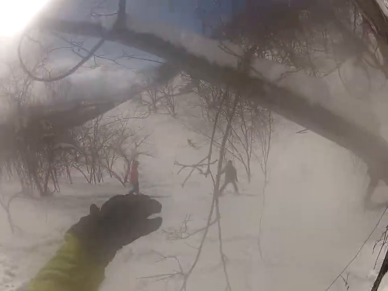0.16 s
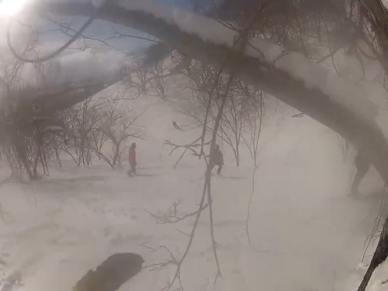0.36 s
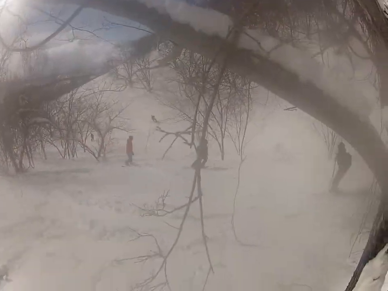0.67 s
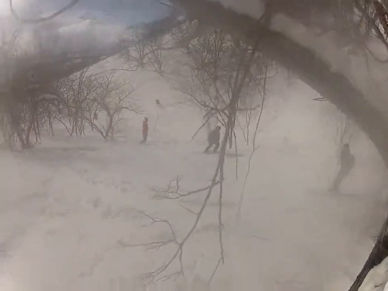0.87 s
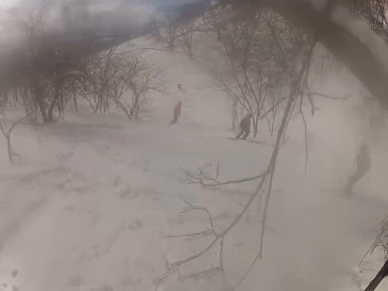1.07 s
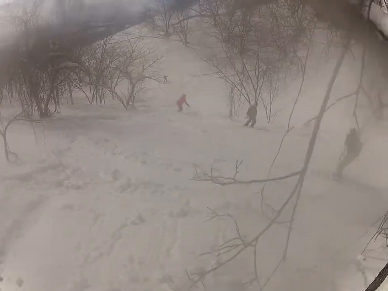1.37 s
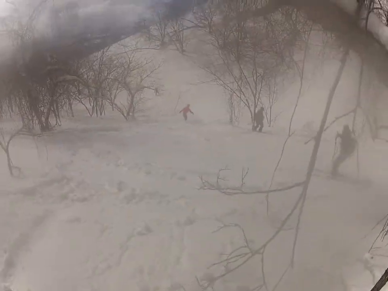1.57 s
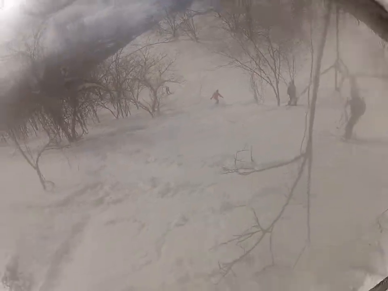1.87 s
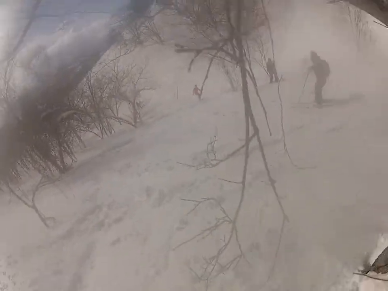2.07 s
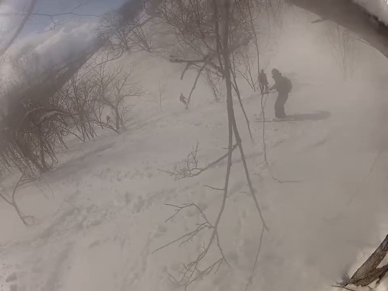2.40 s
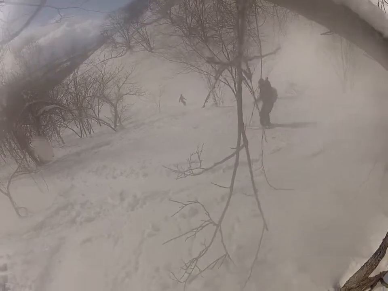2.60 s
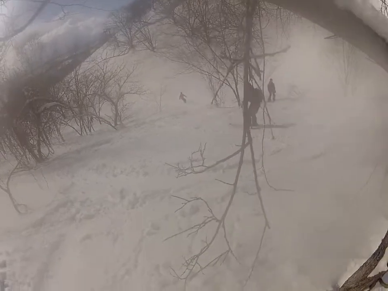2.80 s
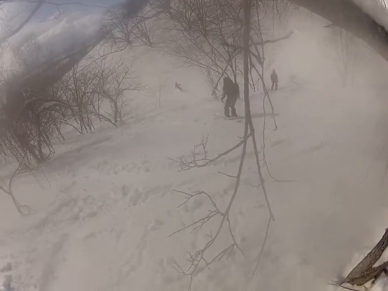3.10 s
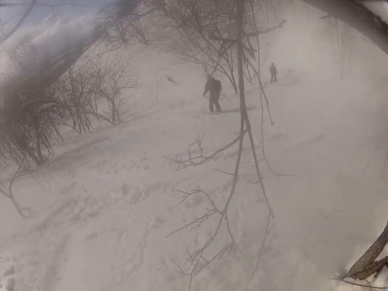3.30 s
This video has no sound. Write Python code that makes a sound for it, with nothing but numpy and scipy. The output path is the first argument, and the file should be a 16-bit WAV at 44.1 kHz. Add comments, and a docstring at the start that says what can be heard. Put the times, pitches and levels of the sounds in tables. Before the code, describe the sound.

Close, rough scraping of snow and twigs on a plastic camera case, with sharp knocks.

```python
"""A sleeve rustles softly; from about 2 s, snow and twigs scrape loudly over a camera's plastic case
as it is carried along a snowy slope. Each rub is stick-slip friction: a stream of tiny slips that
excites the resonances of the case and shakes it. Twigs tick and knock on it, soft bumps rock it,
and the hardest knock overloads the microphone. A faint wind lies underneath."""
import sys
import numpy as np
from scipy import signal
from scipy.fft import rfft, irfft
from scipy.io import wavfile

SR = 44100
rng = np.random.default_rng(int(sys.argv[2]) if len(sys.argv) > 2 else 0)


def wrap_up_sound(samples):
    """Save the sound to the file named by the first command line argument, as 16-bit audio."""
    columns = np.atleast_2d(samples).T
    # keep every value between -1 and 1, then stretch to whole-number steps
    tamed = np.clip(columns, -1, 1)
    steps = np.round(tamed * 32767).astype(np.int16)
    wavfile.write(sys.argv[1], SR, steps)


N = 152145

# resonances of the plastic case (f/Hz, half-width/Hz, level/dB)
CASE_MODES = [(473, 56, -10), (1089, 135.5, 1.15), (1420, 126, -2), (1836, 227, 1.5), (2254, 270, 2.5),
              (2740, 480, -6), (3320, 386, 0.3), (4830, 430, -9.5), (7120, 580, -13.5), (8630, 410, -9.5),
              (9760, 690, -8.5), (14500, 840, -12.5)]
# a slight broad lift near 770 Hz and two deep notches near 6 and 12 kHz (f/Hz, half-width/Hz, gain/dB)
COLOUR_BANDS = [(770, 420, 2), (6030, 254, -12), (11790, 440, -25)]
# thin ring after a contact (f/Hz, level re the hit at zero tilt/dB, T60/s)
RING_MODES = [(3510, -22, 0.028), (8530, -11, 0.0126)]
# spectra of wind, low shudder, hollow midrange and soft cloth (f/Hz, relative level/dB)
WIND_SPECTRUM = [(20, -0.5), (55, 1.5), (110, -9), (200, -8.5), (420, -16.5), (850, -23.5), (3600, -30.5),
                 (5000, -34), (6000, -44.5), (7000, -36.5), (14800, -45.5)]
SHUDDER_SPECTRUM = [(15, -19.5), (30, 0.5), (55, 1), (110, -5.5), (220, -4.5), (330, -15), (600, -43.5),
                    (1500, -76)]
HOLLOW_SPECTRUM = [(120, -30.5), (300, 1), (490, -7), (620, -10.5), (1050, -5.5), (1700, -17.5),
                   (5000, -41)]
CLOTH_SPECTRUM = [(700, 1), (1050, 10.5), (1500, 4), (1950, 11), (2600, -2.5), (4800, 2), (8500, -2.5),
                  (10000, 7)]
# soft bumps (crest t/s, peak level/dB, f/Hz, half-length/ms)
SOFT_BUMPS = [(0.818, -27.5, 50.4, 19.4), (1.384, -43.5, 43, 25), (2.169, -22.5, 56, 13),
              (2.3176, -11, 169, 3), (2.489, -22, 52.4, 17), (2.573, -18, 64, 10.3),
              (3.0347, -2, 157, 2.23), (3.1189, -14.5, 192, 1.97)]
# ticks and knocks on the case: a sleeve click at the start, then twigs (t/s, peak level/dB, tilt/dB per octave,
# decay time/ms, favoured f/Hz)
CONTACT_KNOCKS = [(.0095, -43.5, -1, 2.4, 2000), (0.0561, -38.5, -0.5, 3, 1970),
                  (0.0798, -31.5, -10, 1.77, 1300), (0.464, -28, -2, 1.05, 3470),
                  (1.061, -48.5, -0.5, 0.55, 3550), (1.1, -53.5, -11, 2.2, 1140),
                  (1.237, -40.5, -0.5, 2.4, 3650), (2.062, -39, .5, 0.59, 2250),
                  (2.095, -31.5, -0.5, 2.2, 3800), (2.2368, -8, -1, 4.3, 2070), (2.3021, -4, -1, 1.3, 1190),
                  (2.6026, -12, -1.5, .5, 3480), (2.6408, -5.5, -2, 1.3, 2680), (2.847, -26, -1, 0.95, 3430),
                  (3.0337, 5, -2.5, 1, 1406), (3.0351, 2.5, -2.5, 1.27, 3540), (3.0357, -1.5, -5.5, .7, 960),
                  (3.1298, -25.5, 0, .6, 3320), (3.2838, -14, -3.5, .5, 2170),
                  (3.314, -25.5, -1.5, 0.58, 2400), (3.375, -33, -0.5, 1.3, 3300)]
# brief scuffs (crest t/s, peak level/dB, tilt/dB per octave, half-length/ms, favoured f/Hz)
BRIEF_SCUFFS = [(0.192, -39, -0.5, 1.8, 4700), (0.215, -43.5, -1, 17, 1050), (0.4248, -38.5, 1, 3.3, 1090),
                (0.443, -44.5, -9, 6.1, 1030), (1.67, -50.5, 0, 6.6, 2300), (2.035, -49, -17, 28, 1080),
                (2.107, -35.5, 1.5, 11, 4000), (2.171, -8.5, -5, 2, 1160), (2.182, -2, -4, 2.9, 1800),
                (2.225, -32, -12, 12, 1090), (2.332, -8.5, -3, 5.1, 2300), (2.3641, -6.5, -2, 5.9, 1770),
                (2.429, -6, 1, 6.5, 2540), (2.4428, -7, 2, 1.45, 3200), (2.573, -18.5, -4.5, 2.6, 1780),
                (2.675, -26.5, 1.5, 2.6, 2300), (2.8845, -10, 1.5, 1.3, 2460),
                (3.345, -31.5, -2, 2.4, 2340)]
# rub envelopes of the sleeve and of snow and twigs (t/s, then level/dB of scrape, shudder, hollow)
SLEEVE_RUB = [(0, -54.5, -48.5, -93), (.10, -57.5, -46.5, -93), (.135, -62.5, -56.5, -71),
              (.18, -52.5, -51.5, -64), (.225, -60, -50, -88), (.26, -65.5, -55, -82),
              (.445, -63, -66.5, -86), (.49, -79, -77, -80)]
SNOW_RUB = [(1.99, -79, -79, -92), (2.025, -62.5, -57, -74), (2.142, -53, -62, -81),
            (2.150, -21, -22.5, -50), (2.177, -13.5, -25.5, -34), (2.192, -22, -35, -29),
            (2.206, -20, -34, -40), (2.23, -47, -42, -62), (2.255, -34, -50, -53), (2.295, -22, -31, -32),
            (2.315, -16, -22.5, -16), (2.346, -21.5, -29.5, -37), (2.362, -23.5, -25, -32),
            (2.384, -26, -30, -43), (2.41, -18, -30, -26.5), (2.43, -18.5, -28.5, -33.5),
            (2.462, -18, -28, -34), (2.488, -22, -27.5, -36), (2.51, -41.5, -45, -49),
            (2.565, -20.5, -29.5, -43), (2.596, -36.5, -41.5, -63), (2.63, -34.5, -29.5, -43),
            (2.70, -43, -49, -63), (2.77, -45, -52, -75), (2.83, -42, -35.5, -47), (2.895, -35.5, -30, -40),
            (2.97, -43.5, -45.5, -54), (3.025, -33, -28.5, -38), (3.052, -47, -38, -40.5),
            (3.10, -48.5, -40, -55), (3.123, -33, -29, -29), (3.144, -42, -30, -41),
            (3.167, -37.5, -27.5, -37), (3.178, -33, -17.5, -27), (3.191, -45, -30, -47),
            (3.202, -32, -28.5, -32), (3.235, -48.5, -44, -67), (3.277, -37.5, -36, -30),
            (3.30, -44, -37.5, -52), (3.328, -53, -46.5, -60), (3.40, -56, -50.5, -73),
            (3.45, -56, -55, -73)]

FILTER_HZ = np.maximum(np.arange(2049) * SR / 4096, 10)  # frequency grid of the filters


def undb(db):
    """Amplitude grows tenfold for every 20 dB."""
    return 10 ** (np.asarray(db) / 20)


def unit(x):
    """Normalisation brings a signal to rms 1."""
    return x / np.sqrt(np.mean(x ** 2))


def fluctuation(hz):
    """Low-passed noise varies at random, at rates up to about hz, with rms 1."""
    return unit(signal.sosfilt(signal.butter(2, hz, fs=SR, output="sos"), rng.standard_normal(N)))


def minimum_phase(x, gain_db):
    """Folding the cepstrum gives a causal filter with the given gains at FILTER_HZ."""
    cepstrum = irfft(np.log(undb(gain_db)))
    half = len(cepstrum) // 2
    cepstrum[1:half] *= 2
    cepstrum[half + 1:] = 0
    return signal.fftconvolve(x, irfft(np.exp(rfft(cepstrum))))[:len(x)]


def colour(x, spectrum):
    """Filtering weights a sound by a spectral envelope; the result has rms 1."""
    hz, db = np.array(spectrum).T
    return unit(minimum_phase(x, np.interp(np.log(FILTER_HZ), np.log(hz), db)))


def noise(spectrum):
    """White noise takes on the spectrum of its filter."""
    return colour(rng.standard_normal(N), spectrum)


def wind(level_db=-58, sway_db=1.4):
    """Moving air makes faint broadband noise, muffled by the case."""
    return noise(WIND_SPECTRUM) * undb(level_db + sway_db * fluctuation(hz=2.4))


def bumps():
    """A soft push rocks the case: a brief oscillation under a Gaussian envelope."""
    t = np.arange(N) / SR
    return sum(undb(db) * np.cos(2 * np.pi * hz * (t - s)) * np.exp(-((t - s) * 1000 / half_ms) ** 2)
               for s, db, hz, half_ms in SOFT_BUMPS)


def case(x, tilt_db, favoured_hz=None, favour_db=8, favour_octaves=0.27, valley_db=-22):
    """Resonance filters a contact force: harder contact adds treble, its place favours one region."""
    f = FILTER_HZ
    mode_power = sum(undb(db) ** 2 / (1 + ((f - hz) / width) ** 2) ** 2 for hz, width, db in CASE_MODES)
    modes = 10 * np.log10(mode_power + undb(valley_db) ** 2)
    bands = sum(db * np.exp(-((f - hz) / width) ** 2) for hz, width, db in COLOUR_BANDS)
    place = favour_db * np.exp(-(np.log2(f / favoured_hz) / favour_octaves) ** 2) if favoured_hz else 0
    tilt = tilt_db * np.log2(np.maximum(f, 1100) / 2000)
    return minimum_phase(x, modes + bands + place + tilt)


def knocks(click=0.83, size=4096):
    """Impact excites the case with a click and a crunch; harder contacts leave more thin ring."""
    out, t = np.zeros(N + size), np.arange(size) / SR
    for s, db, tilt_db, decay_ms, favoured_hz in CONTACT_KNOCKS:
        force = rng.standard_normal(size) * np.exp(-t * 1000 / decay_ms)
        force[0] += click
        hit = case(force, tilt_db, favoured_hz)
        ring = sum(undb(ring_db + 2 * tilt_db - 60 * t / t60) * np.sin(2 * np.pi * hz * t)
                   for hz, ring_db, t60 in RING_MODES)
        start = int(s * SR)
        out[start:start + size] += undb(db) * (hit / np.abs(hit).max() + ring)
    return out[:N]


def scuffs(size=4096):
    """Friction catches and lets go: a burst of slips swells and dies, ringing the case."""
    out, t_ms = np.zeros(N + size), (np.arange(size) - size // 2) * 1000 / SR
    for s, db, tilt_db, half_ms, favoured_hz in BRIEF_SCUFFS:
        force = rng.standard_normal(size) * np.exp(-(t_ms / half_ms) ** 2)
        burst = case(force, tilt_db, favoured_hz)
        start = int(s * SR) - size // 2
        out[start:start + size] += undb(db) * burst / np.abs(burst).max()
    return out[:N]


def cracks(per_s=160, level_db=-4):
    """Brittle fracture: single crystals of the snow crust break at random moments."""
    return undb(level_db) * unit(rng.uniform(-1.3, 1, N) * (rng.random(N) < per_s / SR))


def slips(per_s=4500, spread_db=-2.8, smooth_db=2):
    """Stick-slip motion gives random impulses of uneven size, with a smooth hiss between them."""
    sizes = rng.standard_normal(N) * undb(spread_db * np.minimum(rng.exponential(size=N), 4))
    impulses = unit(sizes * (rng.random(N) < per_s / SR))
    return impulses + undb(smooth_db) * rng.standard_normal(N)


def rattle(x, decay_ms=3.9, level_db=-7.5, size=2048):
    """Structural reverberation: vibration runs round the case and smears each slip."""
    t_ms = np.arange(size) / SR * 1000
    tail = unit(rng.standard_normal(size) * np.exp(-t_ms / decay_ms)) / np.sqrt(size)
    return x + undb(level_db) * signal.fftconvolve(x, tail)[:N]


def wander(x, rate_hz=30.5, depth_db=2):
    """Modal coupling varies as the contact moves, so the lower resonances swell and fade."""
    for hz, half_width, _ in CASE_MODES[:7]:
        band = signal.lfilter(*signal.iirpeak(hz, hz / (2 * half_width), fs=SR), x)
        x = x + (undb(depth_db * fluctuation(rate_hz)) - 1) * band
    return unit(x)


def rubbing(envelopes, cloth=False, grip_db=2, pressed_above_db=-23):
    """Sliding friction rings the case, brighter when pressed; the same uneven grip makes it shudder."""
    times, *levels = np.array(envelopes).T
    scrape_db, shudder_db, hollow_db = (np.interp(np.arange(N) / SR, times, db) for db in levels)
    slipping = slips()
    grip = unit(undb(grip_db * fluctuation(hz=120)))
    drag = rattle(slipping * grip + (0 if cloth else cracks()))
    pressed = .5 + .5 * np.tanh((scrape_db - pressed_above_db) / 6)  # 0 light, 1 firm
    firm, light = unit(case(drag, tilt_db=0.56)), unit(case(drag, tilt_db=0.02))
    scrape = wander(pressed * firm + (1 - pressed) * light)
    if cloth:
        scrape = colour(scrape, CLOTH_SPECTRUM)
    shudder = noise(SHUDDER_SPECTRUM) * undb(shudder_db - 1)
    hollow = noise(HOLLOW_SPECTRUM) * undb(hollow_db - 0.5)
    return scrape * undb(scrape_db - 0.5) + grip * (shudder + hollow)


def scene():
    """Superposition: all sources add at the one microphone."""
    rubs = rubbing(SLEEVE_RUB, cloth=True) + rubbing(SNOW_RUB)
    return (rubs + scuffs() + knocks() + bumps() + wind())[None]


def record(dry):
    """Overload clips the signal at full scale; a steep low-pass then limits the bandwidth."""
    cutoff_hz = 15350
    return signal.sosfilt(signal.ellip(8, .2, 70, cutoff_hz, fs=SR, output="sos"), np.clip(dry, -1, 1))


dry = scene()
out = record(dry)
wrap_up_sound(out)
```